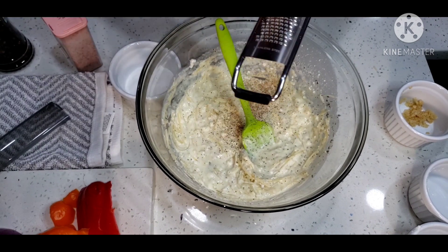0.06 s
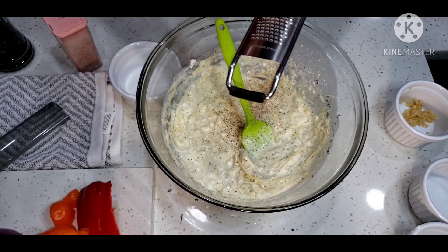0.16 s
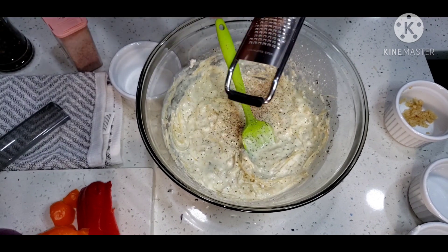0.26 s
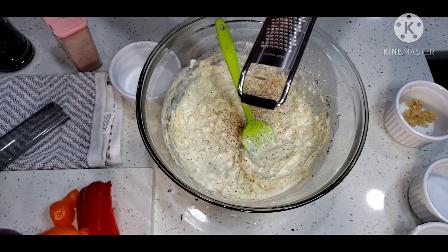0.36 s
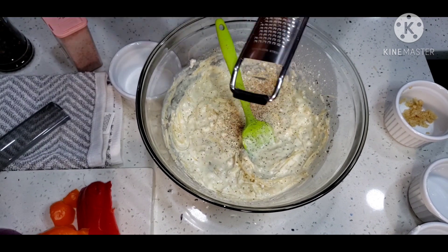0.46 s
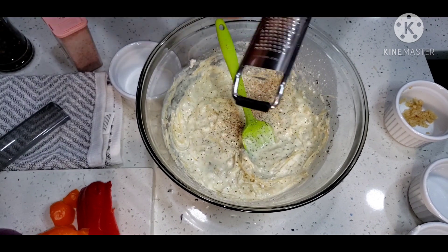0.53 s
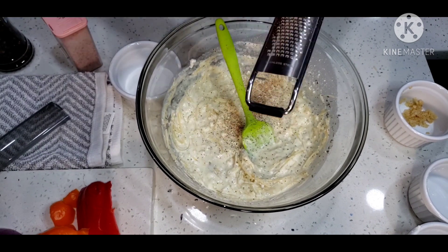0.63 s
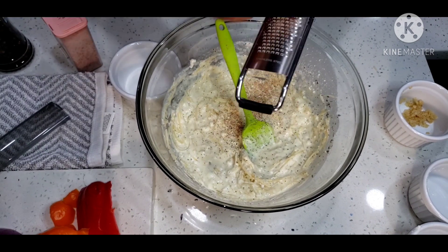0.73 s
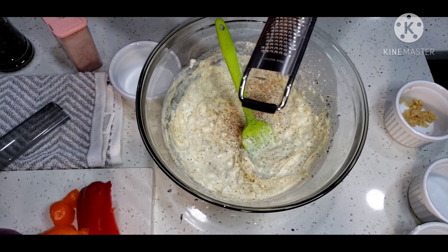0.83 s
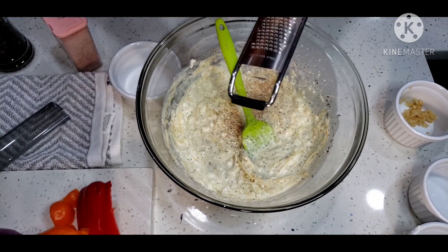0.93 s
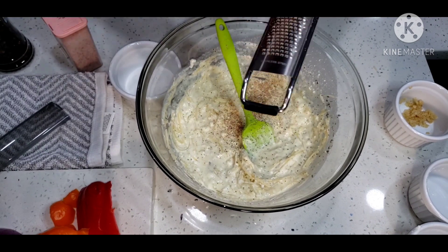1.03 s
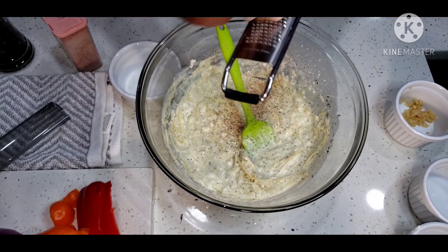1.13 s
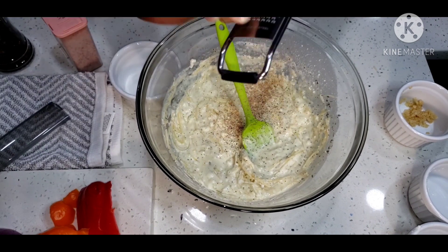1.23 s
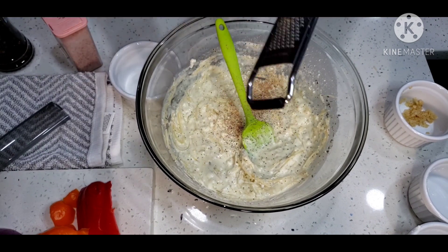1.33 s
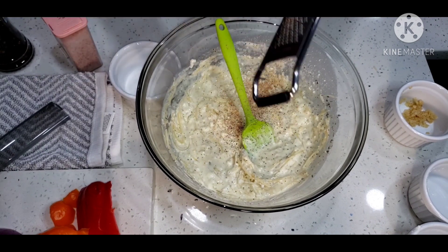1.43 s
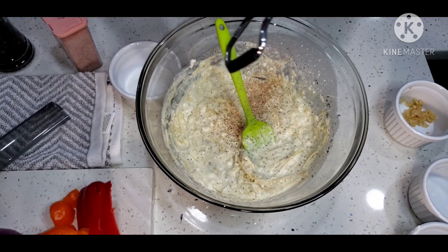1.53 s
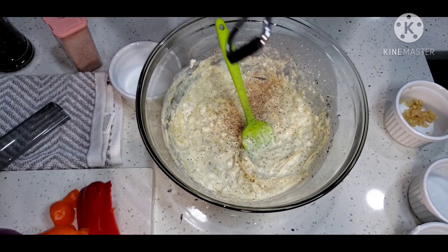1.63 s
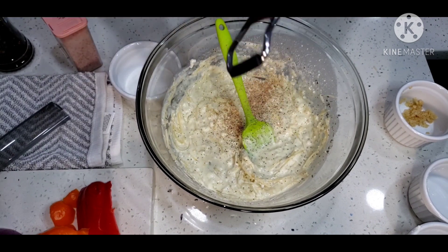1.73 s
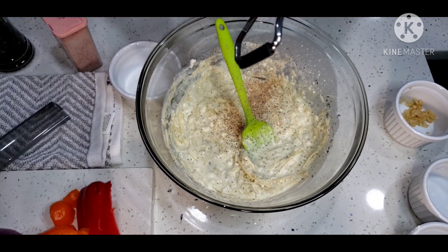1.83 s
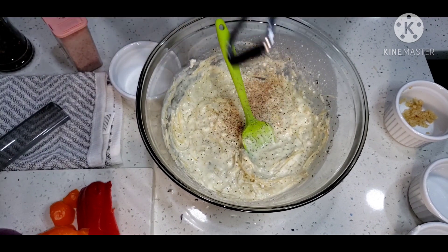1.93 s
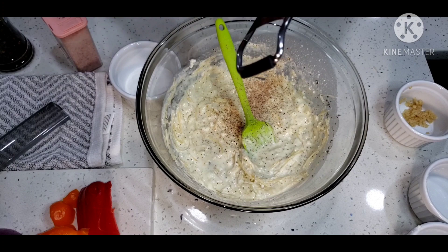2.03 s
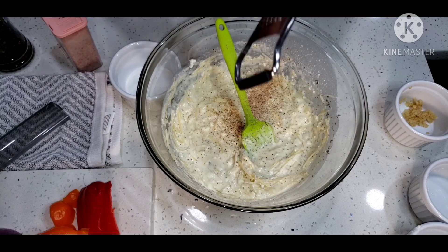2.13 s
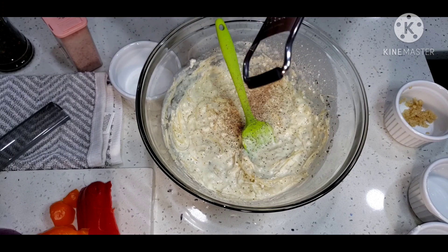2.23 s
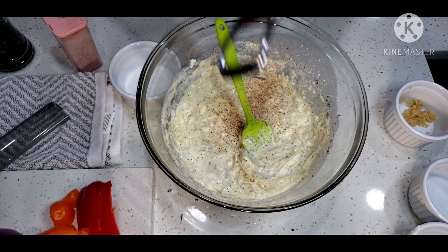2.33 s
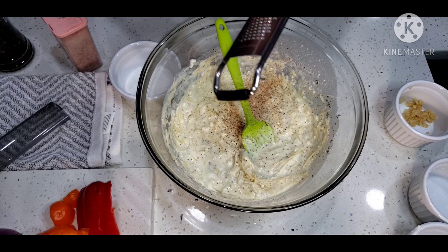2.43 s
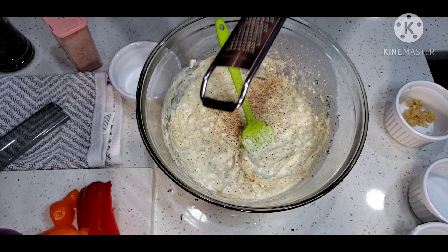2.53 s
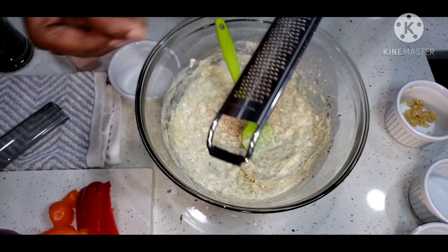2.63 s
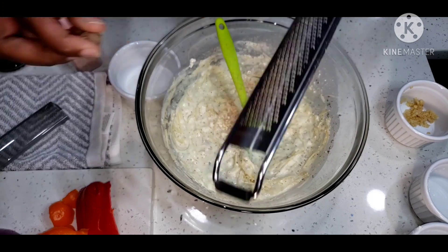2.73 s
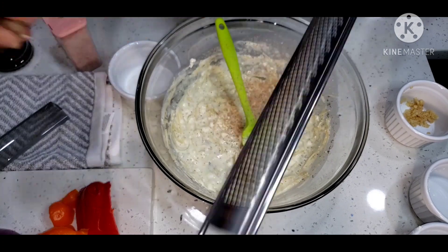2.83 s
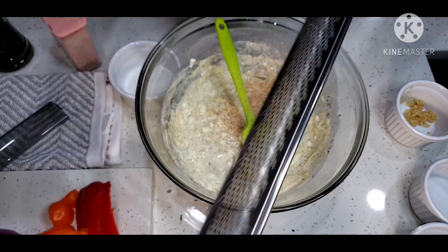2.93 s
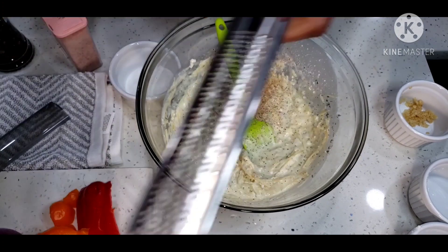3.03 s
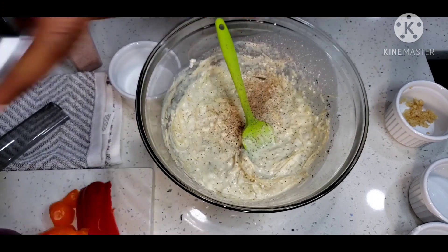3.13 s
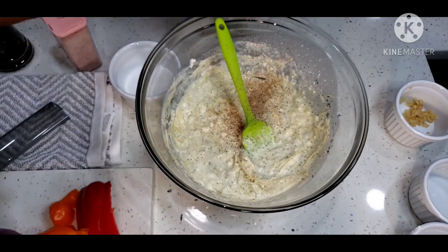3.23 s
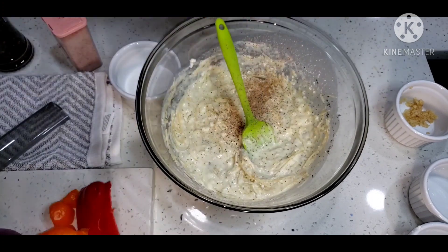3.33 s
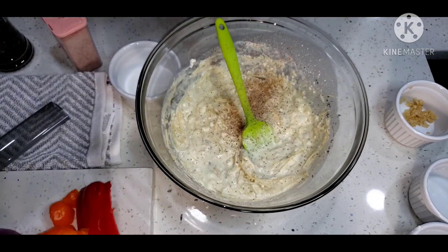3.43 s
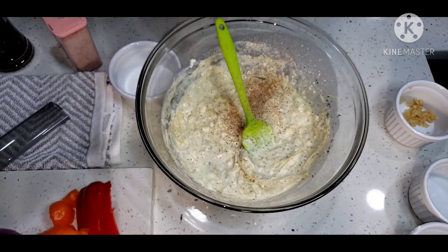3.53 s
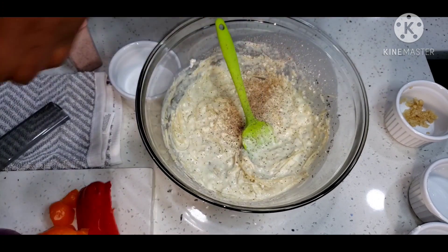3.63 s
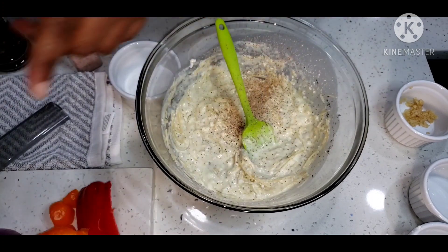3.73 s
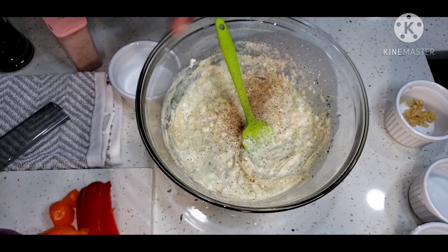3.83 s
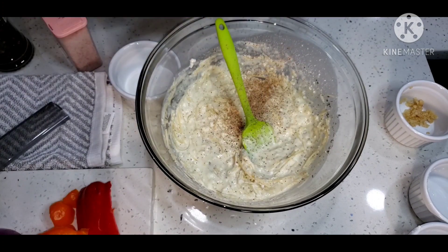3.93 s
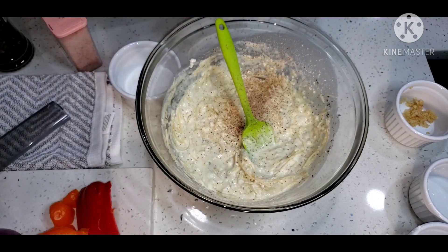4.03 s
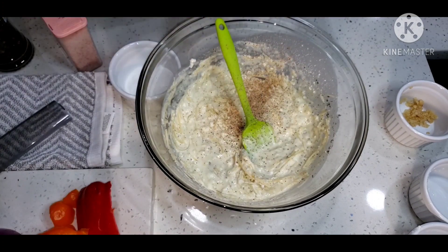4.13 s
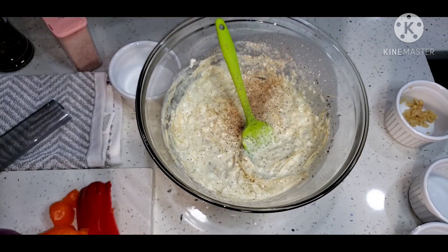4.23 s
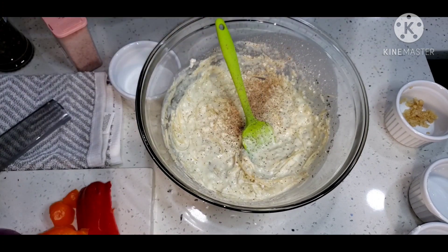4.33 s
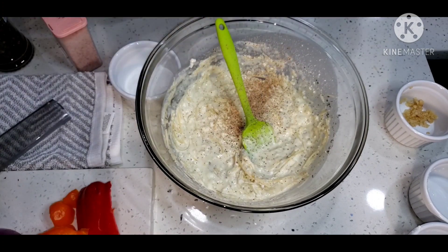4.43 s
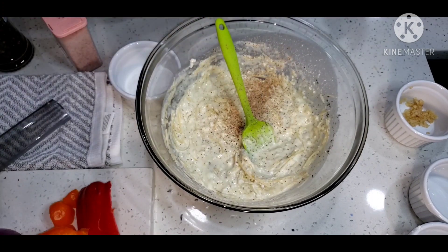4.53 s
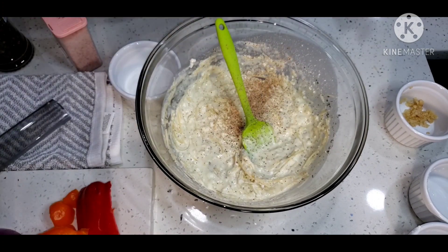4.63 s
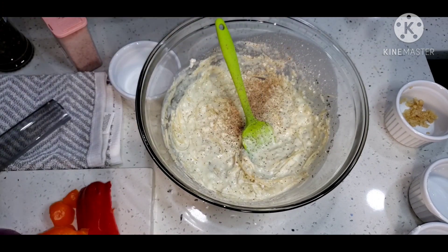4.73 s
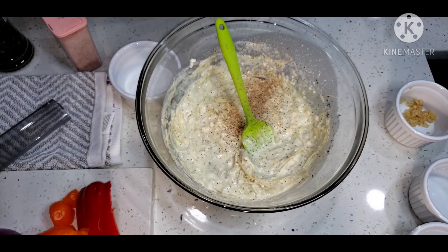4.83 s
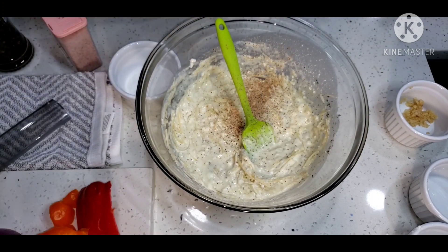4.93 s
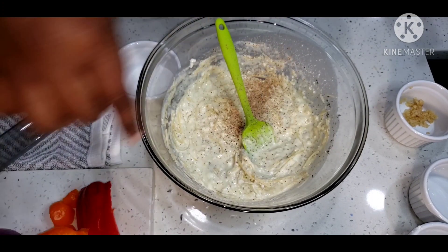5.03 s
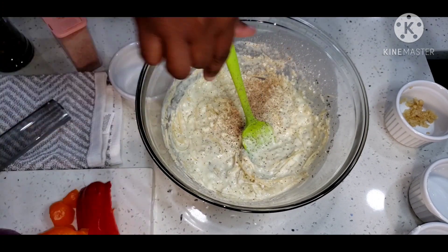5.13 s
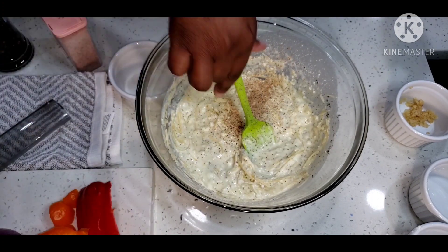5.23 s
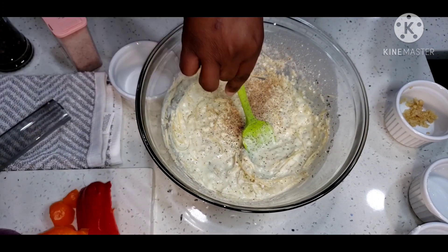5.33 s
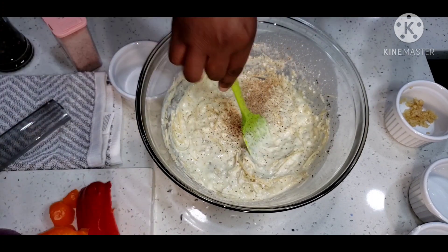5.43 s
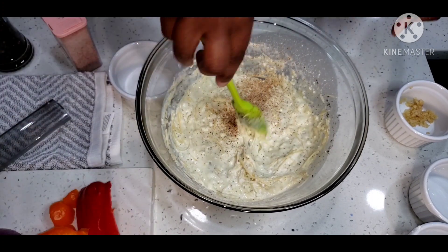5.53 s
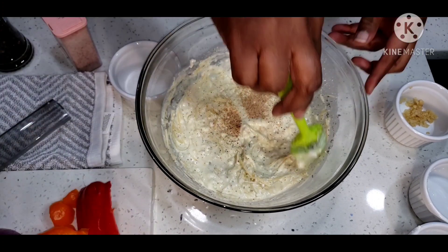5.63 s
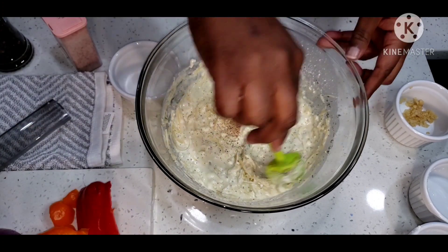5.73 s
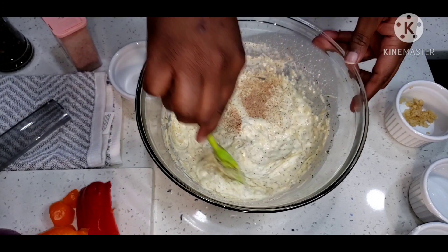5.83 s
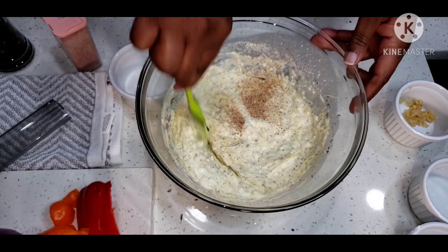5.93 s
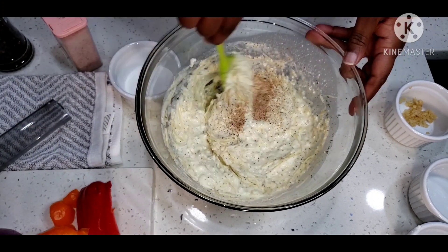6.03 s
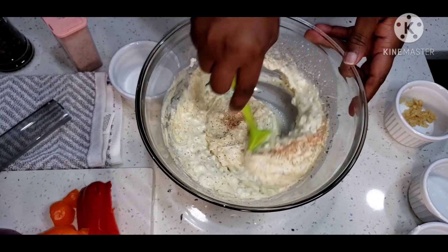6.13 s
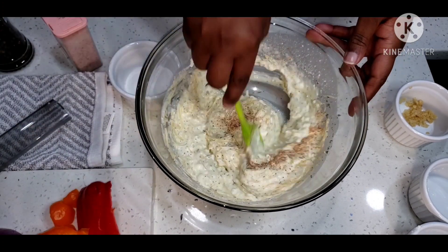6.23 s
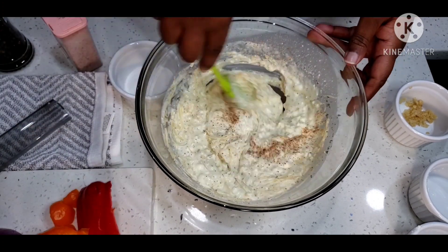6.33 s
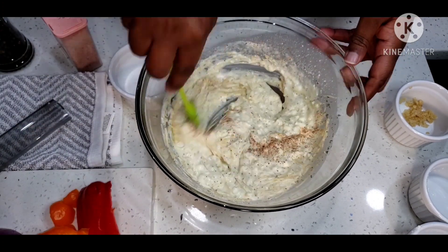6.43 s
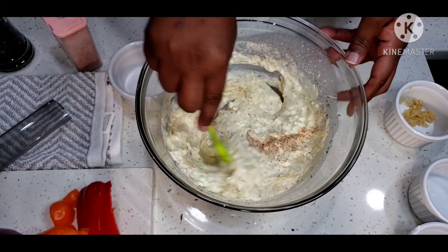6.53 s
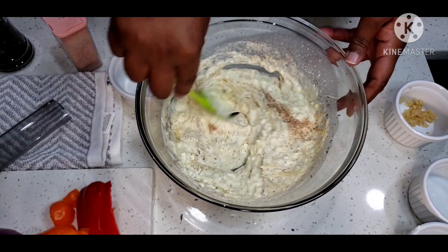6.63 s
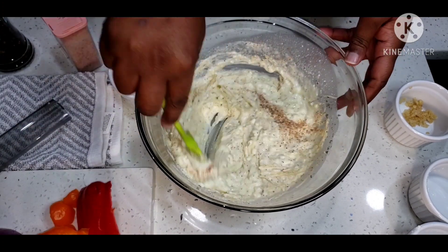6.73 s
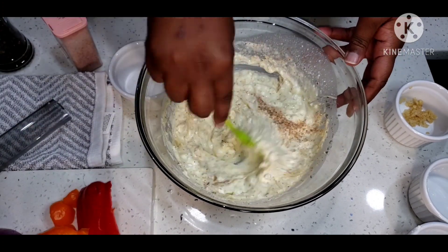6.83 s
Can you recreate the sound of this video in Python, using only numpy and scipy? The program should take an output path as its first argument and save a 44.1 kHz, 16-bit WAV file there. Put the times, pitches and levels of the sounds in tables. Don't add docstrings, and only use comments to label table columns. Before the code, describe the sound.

Close above a bowl in a small hard kitchen, a nutmeg rasps in brisk alternating strokes on a fine steel grater. Five spaced finger taps ring the metal. The grater then lands hard on the counter to the left, bounces, is shoved flat and rattles to rest. After a quiet gap, a spatula stirs stiff batter with dull squelches and sharp ticks against glass. Faint appliance hum runs beneath.

```python
import sys
import numpy as np
from scipy import signal
from scipy.fft import rfft, irfft, next_fast_len
from scipy.io import wavfile
from scipy.ndimage import uniform_filter1d

SR = 44100
rng = np.random.default_rng(int(sys.argv[2]) if len(sys.argv) > 2 else 0)


def level_to_linear(level):
    exponent = np.asarray(level, float) / 20
    return 10 ** exponent


def wav_out(sig):
    wavfile.write(sys.argv[1], SR, np.round(np.clip(np.atleast_2d(sig).T, -1, 1) * 32767).astype(np.int16))


N = 303041
T = np.arange(N) / SR

# pitch_hz [Hz], level_db [dB per Hz]
RASP_COLOUR = [(53, -56), (90, -18), (260, -19.5), (429, -16), (977, -18.5), (1160, -3.5), (1750, -29),
               (2090, -4), (2320, -19.5), (2760, -11.5), (4170, -15), (5300, -13), (6100, -3), (8300, -11),
               (9600, -7), (13700, 0.5), (16000, -8.5)]
# pitch_hz [Hz], level_db [dB per Hz]
LANDING_COLOUR = [(71, -47.5), (120, -14.5), (226, -13.5), (430, -36), (560, -14), (742, 7.5), (950, -7.5),
                  (1600, -9), (2100, -6), (3450, -8), (3660, -18.5), (6110, -8.5), (13600, -13.5),
                  (15000, -14.5), (16000, -72)]
# pitch_hz [Hz], width_hz [Hz], level_db [dB]
TILTED_RINGS = [(5070, 65, -1), (5740, 45, -6.5), (6060, 70, 0.5), (6510, 56, -2), (10060, 29, -1.5),
                (9520, 140, -15), (13200, 35, -10.5), (13590, 46, -4.5), (2000, 37, -9.5), (7140, 40, -7)]
# pitch_hz [Hz], level_db [dB per Hz]
FLAT_COLOUR = [(71, -37), (120, -16.5), (436, -25), (773, 6.5), (1150, -9), (1550, -12), (2000, -10.5),
               (2530, -16), (3380, -10), (4320, -17.5), (6500, -7.5), (7980, -20), (14200, -19),
               (16000, -44)]
# pitch_hz [Hz], width_hz [Hz], level_db [dB]
FLAT_RINGS = [(3240, 30, 3), (3450, 32, 9), (5055, 52, -3.5), (3034, 35, -4), (5830, 35, -2.5),
              (6530, 35, -5.5), (4750, 74, -11), (7200, 54, -6.5), (9700, 45, -9), (11320, 86, -15.5),
              (12300, 36, -12), (13000, 30, -40.5), (13080, 59, -35)]
# pitch_hz [Hz], width_hz [Hz], level_db [dB]
FOLD_RINGS = [(657.5, 15, 6.5), (751, 81, 5.5), (806, 22, -3), (570, 20, -9), (1021, 45, -3)]
# start_s [s], hold_s [s], t60_s [s], level_db [dB], low_ring_db [dB]
RATTLES = [(3.752, 0.0029, 0.15, -28.5, -34.5), (3.796, 0.0026, 0.094, -35, -33), (3.83, .005, 1, -51, -49),
           (4.04, 0.048, 0.17, -58, -50.5), (4.24, 0.004, 0.085, -25.5, -33),
           (4.254, 0.022, 0.14, -29.5, -43), (4.274, 0.011, 0.086, -28.5, -38.5),
           (4.302, 0.027, 0.091, -34.5, -42.5), (4.332, 0.034, 0.08, -31, -41.5),
           (4.385, 0.0083, 0.076, -51, -46), (4.41, 0.16, 0.28, -68, -61.5),
           (4.621, 0.017, 0.35, -55.5, -56.5), (4.71, 0.064, 1, -86, -64.5), (4.752, 0.015, 0.26, -61, -75)]


def on_log(points, hz):
    at, value = np.transpose(points)[:2]
    return np.interp(np.log(np.maximum(hz, 1)), np.log(at), value)


def unit(x):
    return x / np.sqrt(np.sum(x ** 2))


def swell(start_s, rise_s, hold_s, t60_s):
    gain = np.zeros(N)
    end_s = start_s + rise_s + hold_s + 2 * t60_s
    part = slice(int(start_s * SR), int(end_s * SR))
    t = T[part] - start_s
    fading_s = np.clip(t - rise_s - hold_s, 0, None)
    gain[part] = np.clip(t / rise_s, 0, 1) ** 2 * level_to_linear(-60 * fading_s / t60_s)
    return gain


def clicks(rate, spread_db, jerk_db):
    size = level_to_linear(spread_db * np.minimum(rng.exponential(size=N), 3)) * rng.standard_normal(N)
    jerks = np.repeat(rng.standard_normal(N // 200 + 1), 200)[:N]
    jerks = uniform_filter1d(jerks, size=60)
    happens = rng.random(N) < rate / SR
    return unit(size * level_to_linear(jerk_db * jerks) * happens) * np.sqrt(N)


def body(colour, modes, ring_db, size=8192):
    cepstrum = irfft(on_log(colour, np.fft.rfftfreq(size, 1 / SR)) * np.log(10) / 20)
    cepstrum[1:size // 2] *= 2
    cepstrum[size // 2 + 1:] = 0
    out = irfft(np.exp(rfft(cepstrum)))
    t = T[:size]
    for hz, width_hz, db in modes:
        width_hz = max(width_hz, 10, hz / 150)
        ring = np.exp(-np.pi * width_hz * t) * np.sin(2 * np.pi * hz * t)
        out = out + level_to_linear(db + ring_db) * 2 * np.pi * width_hz / SR * ring
    return unit(out)


def restruck(modes, shift, spread_db):
    chance = rng.standard_normal((len(modes), 2))
    return [(hz * (1 + shift * a), width_hz, db + spread_db * b)
            for (hz, width_hz, db), (a, b) in zip(modes, chance)]


def split(x, hz):
    low = signal.sosfilt(signal.butter(2, hz, fs=SR, output="sos"), x)
    high = signal.sosfilt(signal.butter(2, hz, "high", fs=SR, output="sos"), x)
    return low, high


def sound(push, response, hz, low_db):
    low, high = split(signal.fftconvolve(push, response)[:len(push)], hz)
    return high - level_to_linear(low_db) * low


def ports(x, pan_db, lag_s):
    if len(x) == N:
        right = np.interp(T - lag_s, T, x)
    else:
        at = np.arange(len(x))
        right = np.interp(at - round(lag_s * SR), at, x, left=0, right=0)
    return np.array([x * level_to_linear(pan_db / 2), right * level_to_linear(-pan_db / 2)])


def hum():
    hum_colour = [(12, -57), (20, -14), (86, -4.5), (184, -9.5), (251, -13.5), (323, -11.5), (361, -13.5),
                  (535, -16.5), (709, -18.5), (1210, -16), (2180, -29.5), (7950, -20), (9670, -20),
                  (15200, -24), (16500, -24)]
    # pitch_hz [Hz], likeness [0-1]
    likeness = [(60, 0.91), (160, 0.85), (400, 0.58), (1500, 0), (8000, 0.02)]
    # pitch_hz [Hz], width_hz [Hz], level_db [dB]
    humming_bands = [(1610, 150, -2.5), (7120, 540, -5.5), (9860, 160, 0.5), (10900, 285, -3),
                     (1180, 54, -19.5)]
    # pitch_hz [Hz], width_hz [Hz], level_db [dB]
    noise_dips = [(3460, 150, -4), (4540, 210, -5), (8440, 420, -9.5)]
    # time_s [s], level_db [dB]
    rumble = [(0, 5.5), (.6, 1), (1.2, -3), (3.2, -2.5), (3.8, -2), (5, 2.5), (6.9, 2)]
    size = next_fast_len(N)
    freq = np.fft.rfftfreq(size, 1 / SR)
    alike = np.clip(on_log(likeness, freq), 0, 1)
    bumps = 1 + sum(level_to_linear(db + 4.5) / (1 + (2 * (freq - hz) / width_hz) ** 2)
                    for hz, width_hz, db in humming_bands)
    for hz, width_hz, db in noise_dips:
        bumps = bumps * level_to_linear(db / (1 + (2 * (freq - hz) / width_hz) ** 2))
    colour = level_to_linear(on_log(hum_colour, freq)) * bumps
    mid, side = (rfft(rng.standard_normal(size)) * colour for _ in range(2))
    mid, side = mid * np.sqrt(1 + alike), side * np.sqrt(1 - alike)
    rumble_db = np.interp(T, *np.transpose(rumble))
    out = 0
    for hz in 30 * 2 ** np.arange(0, 9.6, .5):
        band = np.clip(1 - 2 * np.abs(np.log2(np.maximum(freq, 1) / hz)), 0, 1) ** .5
        flicker = np.interp(T, np.arange(60) / 8, rng.standard_normal(60))
        pair = np.array([irfft(band * (mid + sign * side), size)[:N] for sign in (1, -1)])
        out = out + level_to_linear(1.2 * flicker + (hz < 140) * rumble_db) * pair
    return unit(out) * np.sqrt(2 * N) * level_to_linear(-64.5) * level_to_linear([[1.8], [-1.8]])


def room(dry):
    # pitch_hz [Hz], t60_s [s]
    kitchen = [(250, 0.59), (1000, 0.48), (4000, 0.44), (12000, 0.24)]
    t, out = T[:SR // 2], []
    freq = np.fft.rfftfreq(len(t), 1 / SR)
    for port in dry:
        noise, tail = rfft(rng.standard_normal(len(t))), 0
        for hz in 125 * 2 ** np.arange(8):
            band = np.clip(1 - np.abs(np.log2(np.maximum(freq, 1) / hz)), 0, 1)
            fade = np.exp(-np.log(1000) * t / on_log(kitchen, hz))
            tail = tail + irfft(noise * band, len(t)) * fade
        tail = level_to_linear(-1.0) * unit(tail * np.clip(t / 0.0024, 0, 1))
        early = split(rng.standard_normal(len(t)), 1310)[1] * np.exp(-t / 0.0028) * (t > .0008)
        late_sound = signal.fftconvolve(dry.mean(axis=0), tail)
        early_sound = signal.fftconvolve(port, level_to_linear(-4.0) * unit(early))
        out.append((late_sound + early_sound)[:N])
    lean_db = np.where(np.abs(T - 4.2) < 1.2, 3.0, 1.5)
    return np.array(out) * level_to_linear(np.outer([1, -1], lean_db))


def counter_boom():
    shapes = np.array([swell(s, 0.0043, hold_s, t60_s + 0.121) for s, hold_s, t60_s, *_ in RATTLES])
    shake = level_to_linear(np.array(RATTLES)[:, 4]) @ shapes * rng.standard_normal(N)
    boom = split(split(shake, 290)[0], 290)[0]
    return ports(level_to_linear(-4.5) * boom, 4.0, 0)


def clear_rings():
    touches = [(3.397, 2326, 21, -57), (4.045, 6500, 90, -48), (4.762, 3200, 40, -61),
               (4.764, 4700, 30, -59.5), (4.632, 4200, 27, -55), (1.9, 1150, 110, -55),
               (2.361, 1250, 120, -36.5), (4.05, 1050, 40, -48), (4.082, 2700, 140, -43),
               (5.36, 410, 14, -60), (5.876, 3110, 24, -63), (5.876, 3750, 18, -62), (5.876, 7360, 60, -53),
               (5.7, 9990, 20, -62), (9.4, 3700, 82, -50), (4.405, 657, 6.6, -51), (4.285, 3430, 30, -38),
               (4.336, 3430, 25, -40), (1.72, 13906, 30, -42), (3.747, 13000, 30, -37),
               (6.15, 1600, 6, -67), (6.8612, 700, 56, -37.5), (6.8612, 1550, 67, -39),
               (6.372, 1650, 50, -51), (6.622, 620, 14, -55)]
    ring = sum(level_to_linear(db) * swell(s, 0.00055, 0, np.log(1000) / np.pi / width_hz) * np.sin(2 * np.pi * hz * T)
               for s, hz, width_hz, db in touches)
    return ports(ring * (T < 5), 16.0, .00035) + ports(ring * (T > 5), 9.7, -0.00008)


def ticks():
    # start_s [s], peak_db [dB], treble_share_db [dB], ring_hz [Hz], knock_db [dB]
    steel_ticks = [(3.252, -42, -15, 6600, -66), (3.2976, -39.5, -4, 3100, -65.5),
                   (3.3313, -36, -11.5, 6290, -78), (3.3494, -58, -13, 6860, -92),
                   (3.3941, -40, -3.5, 2210, -69), (3.9923, -41.5, -19, 2060, -60.5),
                   (4.0123, -24.5, -28, 2480, -51.5), (4.0326, -21, -24.5, 2070, -54),
                   (4.048, -33, -31, 6600, -57.5), (4.069, -30, -30, 3100, -61.5),
                   (4.0758, -30, -22, 6760, -57.5), (4.081, -27, -22.5, 3720, -50.5),
                   (4.618, -43, -10, 5940, -73), (4.633, -40.5, -12, 3360, -75.5),
                   (4.7294, -51, -20, 4030, -54), (4.7628, -39, -17, 3310, -72),
                   (4.7753, -36, -17, 4000, -65)]
    # start_s [s], peak_db [dB], treble_share_db [dB], ring_hz [Hz],
    # knock_db [dB]
    batter_ticks = [(5.3499, -47, -19, 7190, -61), (5.3818, -68, -7, 6130, -58),
                    (5.875, -46, -25, 7000, -57), (5.948, -35, -10, 6340, -70),
                    (5.9598, -42, -1, 2700, -59), (5.9714, -44, -21.5, 2320, -74),
                    (5.9983, -42, -4, 5540, -70), (6.0164, -29, -4.5, 7160, -79),
                    (6.066, -34, -17, 7360, -63), (6.118, -44, 2, 6500, -80),
                    (6.1304, -34.5, -22, 4750, -84), (6.316, -52, -4, 6600, -91)]
    # start_s [s], peak_db [dB], ring_hz [Hz], knock_db [dB], knock_hz [Hz]
    bowl_ticks = [(6.3554, -34.5, 2100, -37.5, 1444), (6.378, -27.5, 6840, -51, 1610),
                  (6.4938, -12.5, 7660, -37, 2730), (6.5255, -20.5, 7300, -65, 1520),
                  (6.349, -40, 7000, -54, 1730), (6.4865, -29, 9000, -72, 1510),
                  (6.562, -39, 11000, -74, 1500), (6.5353, -30, 2800, -51, 1500),
                  (6.579, -37.5, 2500, -50, 1510), (6.6204, -40, 2360, -48, 600),
                  (6.643, -24.5, 7240, -48.5, 900), (6.655, -22, 6400, -45, 2830),
                  (6.6644, -39, 2920, -74, 530), (6.6912, -25.5, 6800, -56, 670),
                  (6.8002, -18, 6700, -53, 1180), (6.8304, -31, 6850, -69, 946),
                  (6.8623, -37, 2030, -37, 700)]
    rows = [(*row, 690) for row in steel_ticks]
    rows += [(*row, 900) for row in batter_ticks]
    rows += [(s, db, 1.5 + 0.63 * db, *rest) for s, db, *rest in bowl_ticks]
    out, t = np.zeros((2, N + 4096)), T[:4096]
    for s, peak_db, treble_db, ring_hz, knock_db, knock_hz in rows:
        burst = rng.standard_normal(4096) * np.exp(-t / .0009)
        middle, treble = split(split(burst, 2000)[1], 7500)
        ring = np.sin(2 * np.pi * ring_hz * t) * np.exp(-t * ring_hz / 1.7)
        crack = level_to_linear(peak_db - 7.0) * (0.62 * middle + 1.4 * ring + level_to_linear(treble_db + 11.0) * treble)
        knock = np.sin(2 * np.pi * knock_hz * t) * np.exp(-t * knock_hz / 3.8)
        knock = level_to_linear(knock_db + 4.0) * knock * np.clip(t * knock_hz, 0, 1)
        pan_db, lag_s = (12.0, .00035) if s < 5 else (6.0, -.00007)
        start = int(s * SR)
        out[:, start:start + 4096] += ports(crack + knock, pan_db, lag_s)
    return out[:, :N]


def rub():
    rubs = [(2.99, 0.036, 0.12, -49.5, -89), (3.06, 0.045, 1, -72, -67), (3.24, 0.056, 0.9, -64, -70.5),
            (3.3, 0.13, 0.37, -72, -68), (4.84, 0.039, 0.26, -69.5, -61.5), (5.34, 0.012, 1, -85, -60.5),
            (5.866, 0.014, 0.71, -64, -51), (5.93, 0.023, 1.0, -60, -71), (6.1, 0.039, 0.52, -67, -72),
            (6.333, 0.019, 0.53, -56, -61.5), (6.44, 0.021, 0.27, -66, -77),
            (6.485, 0.01, 0.038, -73, -49.5), (6.5, 0.0074, 0.78, -52.5, -60.5),
            (6.62, 0.022, 0.51, -61, -53.5), (6.79, 0.013, 0.71, -55.5, -59), (6.85, 0.011, .3, -64, -52)]
    # pitch_hz [Hz], level_db [dB per Hz]
    scrape_colour = [(880, -42), (1500, 1), (1660, -6), (2510, -11), (3880, -8.5), (6310, -8.5),
                     (12900, -7.5), (16000, -10)]
    # pitch_hz [Hz], width_hz [Hz], level_db [dB]
    wiped_rings = [(5100, 37, -0.5), (5852, 26, 1), (6500, 33, 8), (7047, 25, 4), (7480, 25, 7),
                   (10400, 40, -14), (10960, 40, -5), (11460, 40, 2), (12730, 50, 1), (14840, 60, -10)]
    # pitch_hz [Hz], level_db [dB per Hz]
    squelch_colour = [(120, -6), (200, -17), (600, 3), (782, -6), (966, 4.5), (1570, -13.5), (2500, -59.5),
                      (3250, -26.5), (5500, -120)]
    shapes = np.array([swell(s, rise_s, 0, t60_s) for s, rise_s, t60_s, *_ in rubs])
    gain, squelch_gain = level_to_linear(np.array(rubs)[:, 3:].T) @ shapes
    pan_db = np.where(T < 5, 21, 9)
    skin, blade = body(scrape_colour, [], 0), body(RASP_COLOUR, wiped_rings, 3.0)
    wiping = (T < 3.16) | (np.abs(T - 4.9) < .2)
    shared, *own = (clicks(6000, 1.7, 2.5) for _ in range(3))
    sides = []
    for grain in own:
        push = gain * (shared + grain)
        wipe = level_to_linear(3.5) * sound(push * wiping, blade, 2900, -13.0)
        scrape = signal.fftconvolve(push * ~wiping, skin)[:N]
        sides.append(wipe + scrape)
    stir = squelch_gain * clicks(1200, 0.55, 0.33)
    squelch = signal.fftconvolve(stir, body(squelch_colour, [], 0))[:N]
    scraping = level_to_linear(-5.5) * np.array(sides) * level_to_linear([pan_db / 2, -pan_db / 2])
    return scraping + ports(level_to_linear(-8.5) * squelch, 11.7, -0.000044)


def rattle():
    # pitch_hz [Hz], width_hz [Hz], level_db [dB]
    settled_rings = [(659, 13, 14.5), (793, 95, 0.5), (1180, 17, -7)]
    settles_s = 4.385
    shapes = np.array([swell(s, 0.0013, hold_s, t60_s) for s, hold_s, t60_s, *_ in RATTLES])
    gain, fold_gain = level_to_linear(np.array(RATTLES)[:, 3:].T) @ shapes
    push = gain * clicks(6000, 4.0, 1.5)
    tilted = sound(push * (T < 4.2), body(LANDING_COLOUR, TILTED_RINGS, -1.86), 1800, -2.5)
    flat = sound(push * (T >= 4.2), body(FLAT_COLOUR, FLAT_RINGS, 1.0), 2670, -6.5)
    shake = fold_gain * clicks(1500, 1.5, 2.4)
    fold = 0
    for when, modes in ((T < settles_s, FOLD_RINGS), (T >= settles_s, settled_rings)):
        fold = fold + signal.fftconvolve(shake * when, body(FLAT_COLOUR, modes, 20.6, size=16384))
    fold = split(fold[:N], 840)[1]
    return ports(level_to_linear(-6.5) * (tilted + flat), 11.1, 0.000455), ports(fold, 16.6, 0.00035)


def blows(table, colour, modes, db, low_db, ring_db, lag_s):
    out, t = np.zeros((2, N)), T[:24000]
    for s, peak_db, share_db, pan_db, chatter_s, *knock_hz in table:
        struck = restruck(modes, 0.011, 1.6) + [(hz, 300, 6.0) for hz in knock_hz]
        chatter = np.exp(-t / max(chatter_s, .001)) * np.clip(t / 0.000122, 0, 1)
        push = rng.standard_normal(len(t)) * chatter
        blow = sound(push, body(colour, struck, ring_db, size=16384), 9000, share_db + low_db)
        start = int(s * SR)
        out[:, start:start + len(t)] += ports(level_to_linear(peak_db + db) * blow, pan_db, lag_s)
    return out


def grater_falls():
    landings = [
        (3.745, 2, -24.5, 22.5, 0.0031),
        (3.752, -18, -5, -4, 0.0078),
        (3.801, -10.5, -9, 12, 0.003),
        (4.239, -2.5, -18.5, 22, 0.0063),
        (4.287, -27.5, 6, 19.5, 0.0046),
        (4.3336, -26.5, -3.5, 16, 0.0048),
    ]
    drop = blows(landings[:3], LANDING_COLOUR, TILTED_RINGS + FOLD_RINGS, -15.5, 5.9, -1.3, 0.00019)
    shove = blows(landings[3:], FLAT_COLOUR, FLAT_RINGS + FOLD_RINGS, -13.0, 2.7, -23.0, 0.000317)
    return drop + shove


def finger_taps():
    finger_blows = [
        (1.509, -26.5, -16, 0.015, 3600),
        (1.719, -23, -17, 0.0078, 2490),
        (1.928, -33, -19, 0.0078, 1080),
        (2.14, -32, -19.5, 0.012, 1170),
        (2.36, -19.5, -23.5, 0.0027, 1160),
    ]
    # pitch_hz [Hz], level_db [dB per Hz]
    tap_colour = [(180, -111), (300, -61), (780, -34), (950, -13), (1650, -1), (2000, 1), (2880, -4.5),
                  (3190, -3.5), (5340, -7), (6300, 1), (8090, -2.5), (13800, 2), (16000, 2.5)]
    # pitch_hz [Hz], width_hz [Hz], level_db [dB]
    frame_rings = [(2081, 30, -4), (2250, 34, -3), (3095, 24, 3), (3265, 22, 9), (3600, 28, 3),
                   (6075, 40, 2), (6390, 45, -1), (7065, 48, 2), (7700, 50, 2), (10240, 60, 3),
                   (12900, 80, -10), (13900, 90, 9), (15230, 100, 4)]
    pan_db = 9.5
    table = [(s, db, share_db, pan_db, *rest) for s, db, share_db, *rest in finger_blows]
    return blows(table, tap_colour, frame_rings, -4.0, 18.6, -7.0, -0.00019)


def bite():
    # start_s [s], speeding_up_s [s], slowing_down_s [s], level_db [dB]
    strokes = [(-.03, 0.08, 0.093, -37.5), (0.133, 0.08, 0.036, -28.5), (0.244, 0.055, 0.063, -37.5),
               (0.371, 0.074, 0.041, -29), (.485, 0.063, 0.064, -36), (0.614, 0.073, 0.048, -29),
               (.72, 0.1, 0.044, -39), (0.863, 0.076, 0.049, -29.5), (.975, 0.065, 0.082, -41),
               (1.108, 0.071, 0.073, -27.5), (1.22, 0.029, 0.028, -35), (.150, .004, .015, -46),
               (.164, .004, 0.036, -40.5), (.408, .004, 0.028, -40), (.639, 0.0042, 0.023, -40),
               (.904, 0.0043, 0.027, -37), (1.135, 0.006, 0.037, -47)]
    power, limit = 1.68, 0.71
    gain = 0
    for start_s, rise_s, fall_s, db in strokes:
        turn = np.interp(T, [start_s, start_s + rise_s, start_s + rise_s + fall_s], [0, np.pi / 2, np.pi])
        speed = np.abs(np.sin(turn))
        gain = gain + level_to_linear(db) * np.tanh(limit * speed ** power) / np.tanh(limit)
    return gain


def rasp():
    # pitch_hz [Hz], width_hz [Hz], level_db [dB]
    blade_rings = [(1987, 130, -8.5), (2807, 92, -8.5), (5930, 71, -5), (6430, 140, -2.5), (7400, 60, -3),
                   (10360, 57, 6), (10800, 43, -14), (12000, 200, -6), (13800, 69, 1), (14780, 170, 10)]
    # late_s [s], level_db [dB]
    bowl_echoes = [
        (.00057, -13),
        (.0021, -11),
    ]
    gain = bite()
    bite_db = 20 * np.log10(np.maximum(gain / gain.max(), .01))
    low_db = -18.5 - 0.37 * bite_db
    end, hop = int(1.5 * SR), 2600
    shared = clicks(16000, 1.2, 1.2)
    teeth = np.array([gain * (shared + 1.486 * clicks(12000, 1.9, 0.83)) for _ in range(2)])[:, :end]
    out = np.zeros((2, N))
    for start in range(-hop, end - 12000, hop):
        hold = np.clip(1 - np.abs(np.arange(end) - start - hop) / hop, 0, 1) ** .5
        chance = rng.standard_normal((len(RASP_COLOUR), 2))
        colour = [(hz * (1 + .012 * a), db + 1.5 * b) for (hz, db), (a, b) in zip(RASP_COLOUR, chance)]
        blade = body(sorted(colour), restruck(blade_rings, .01, 2.5), -5.0, size=4096)
        part = slice(max(start, 0), start + 2 * hop + 4096)
        for side in range(2):
            out[side, part] += sound((teeth[side] * hold)[part], blade, 2020, low_db[part] + 11.5)
    for late_s, db in bowl_echoes:
        out = out + level_to_linear(db) * np.roll(out, round(late_s * SR), axis=1)
    return level_to_linear(-7.5) * out * level_to_linear([[1.8], [-1.8]])


def scene():
    background = hum() + counter_boom() + clear_rings()
    small = ticks() + rub()
    buzz, fold = rattle()
    loud = finger_taps() + grater_falls() + buzz
    grating = rasp()
    walls = room(loud + level_to_linear(-10) * fold + level_to_linear(-4.5) * grating + level_to_linear(-6.0) * small)
    return grating + loud + fold + small + walls + background


def low_pass(x):
    return signal.sosfilt(signal.butter(12, 16780, fs=SR, output="sos"), x)


def record(dry):
    bass_cut = signal.butter(3, 45, "high", fs=SR, output="sos")
    top_cut = signal.ellip(8, .3, 40, 15600, fs=SR, output="sos")
    mix = signal.sosfilt(np.vstack([bass_cut, top_cut]), dry)
    return low_pass(mix)


dry = scene()
out = record(dry)
wav_out(out)
```